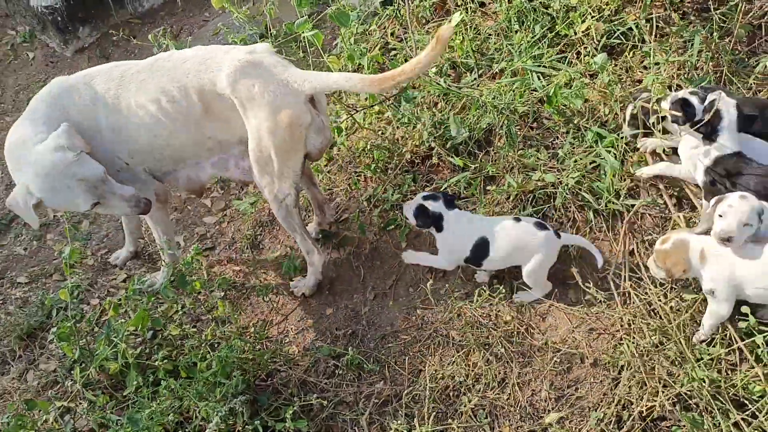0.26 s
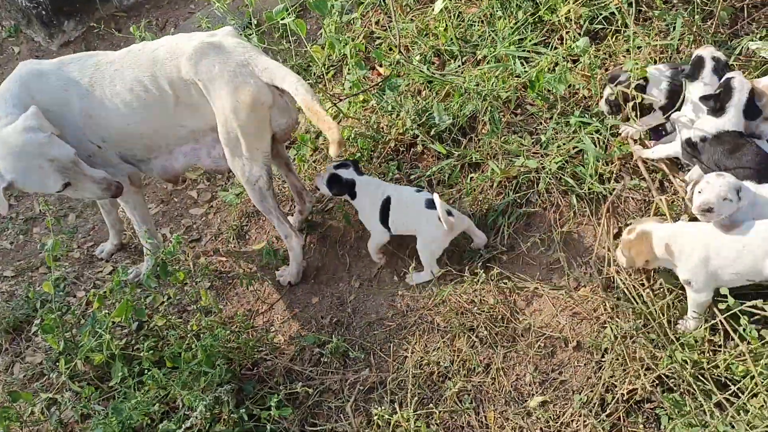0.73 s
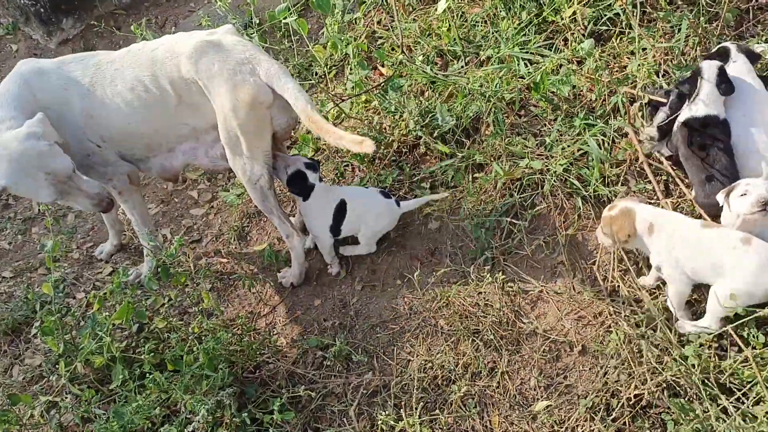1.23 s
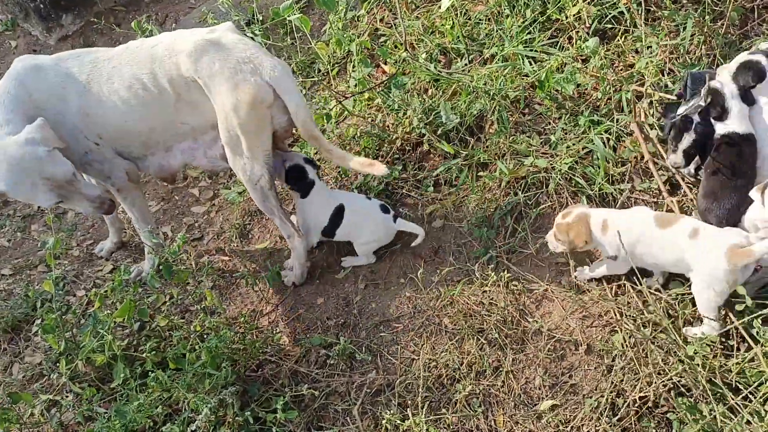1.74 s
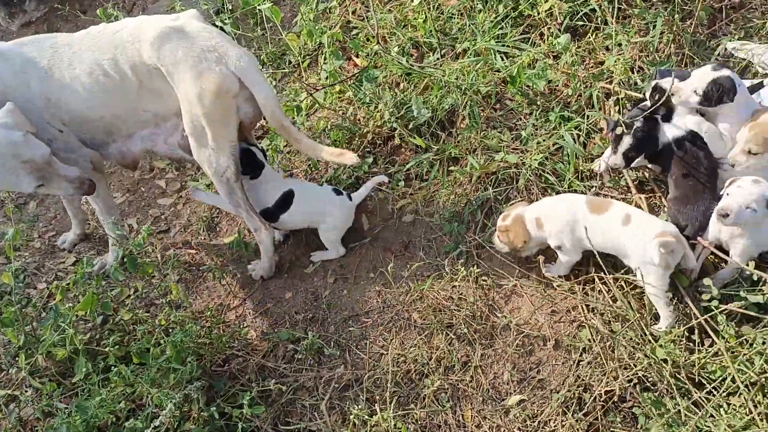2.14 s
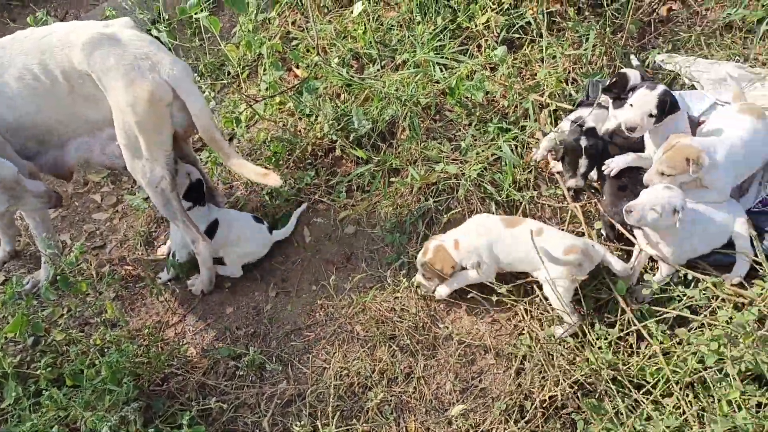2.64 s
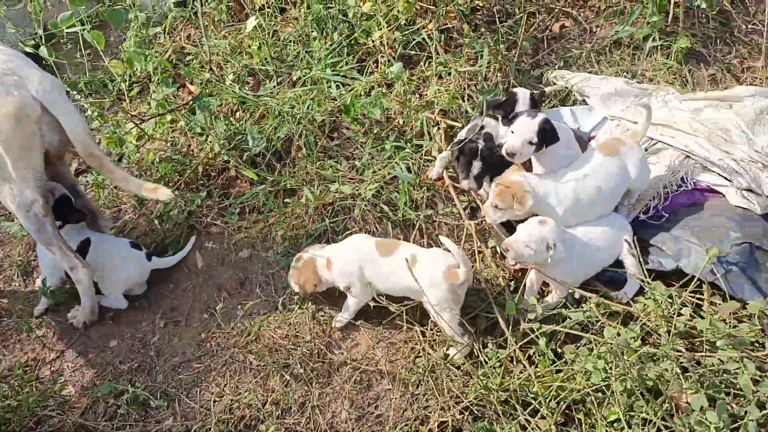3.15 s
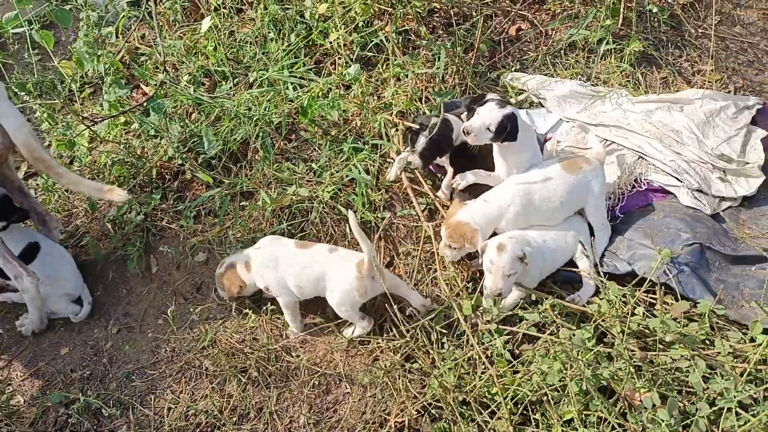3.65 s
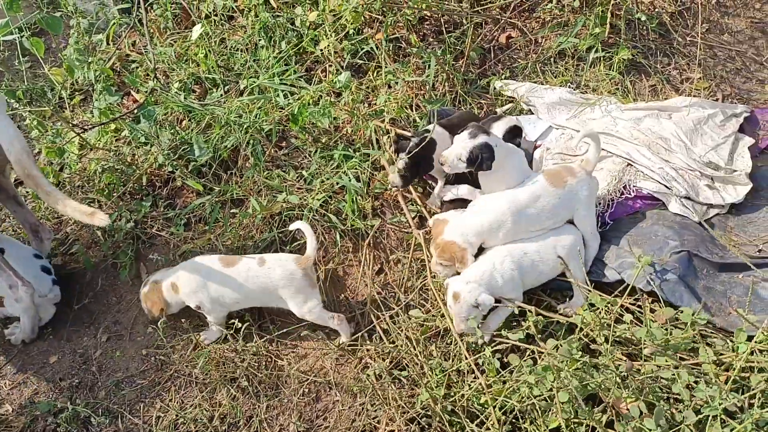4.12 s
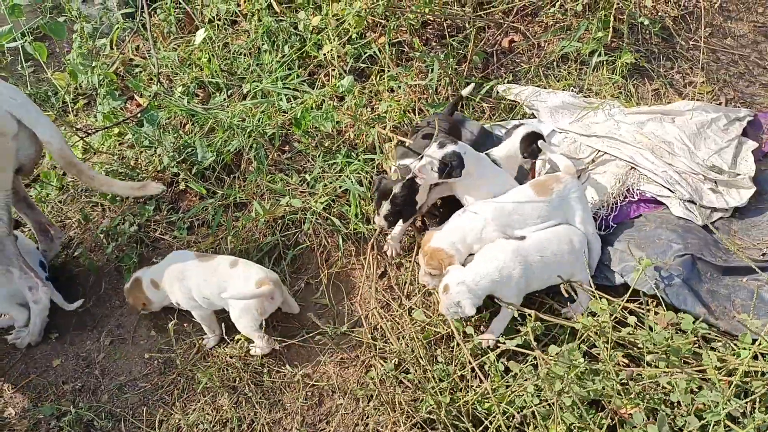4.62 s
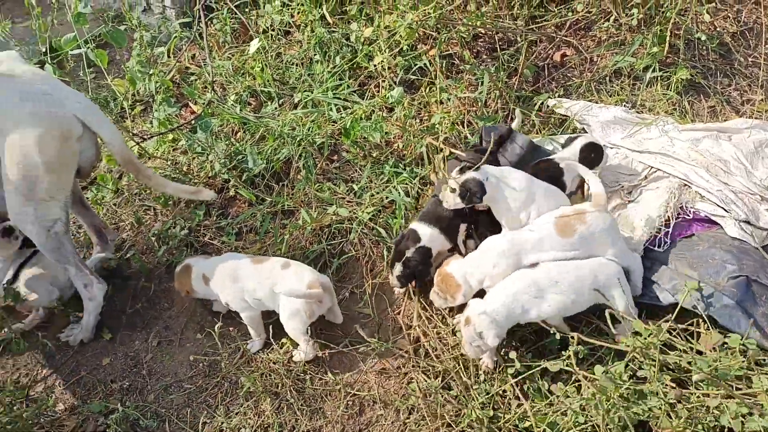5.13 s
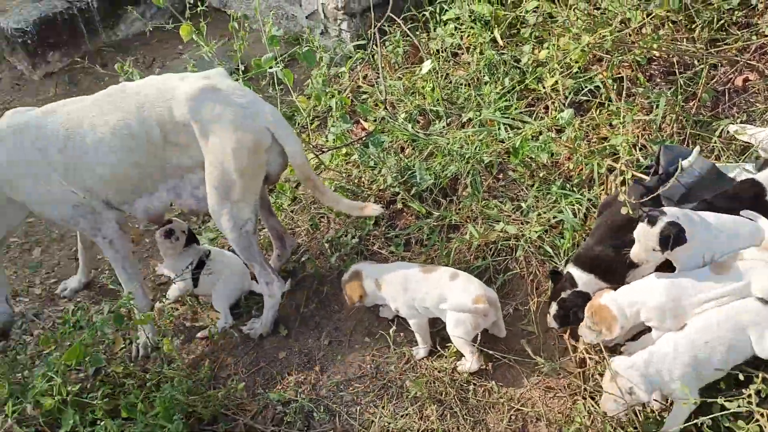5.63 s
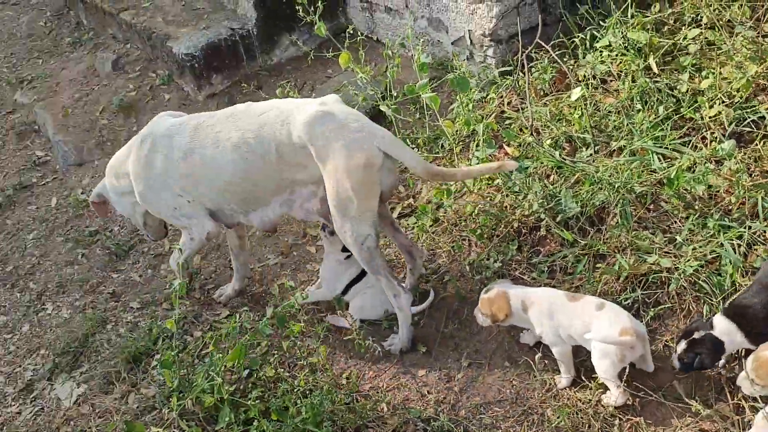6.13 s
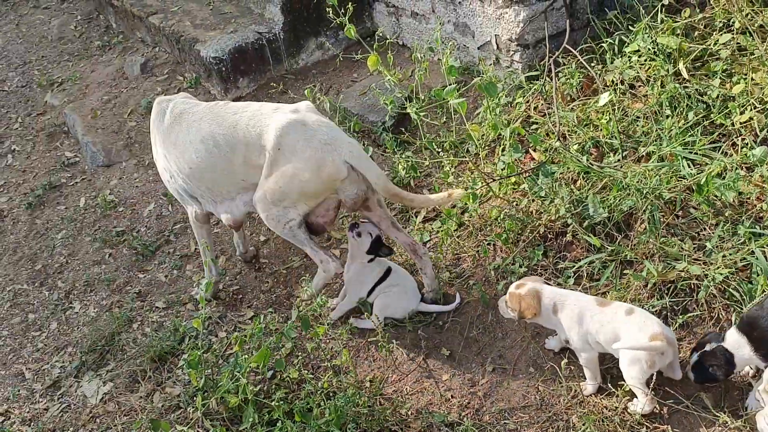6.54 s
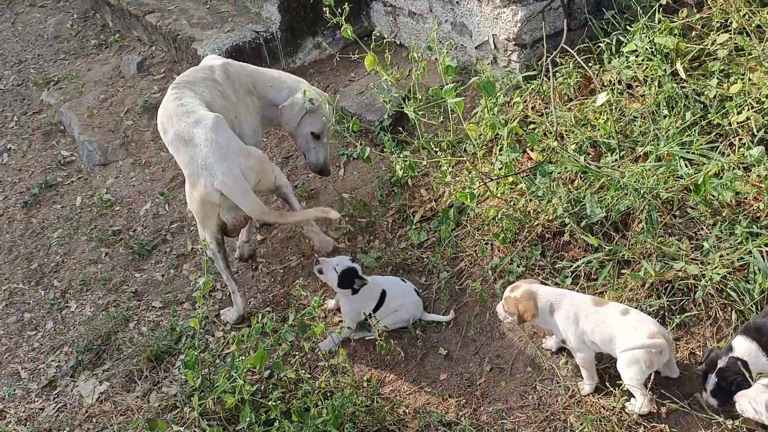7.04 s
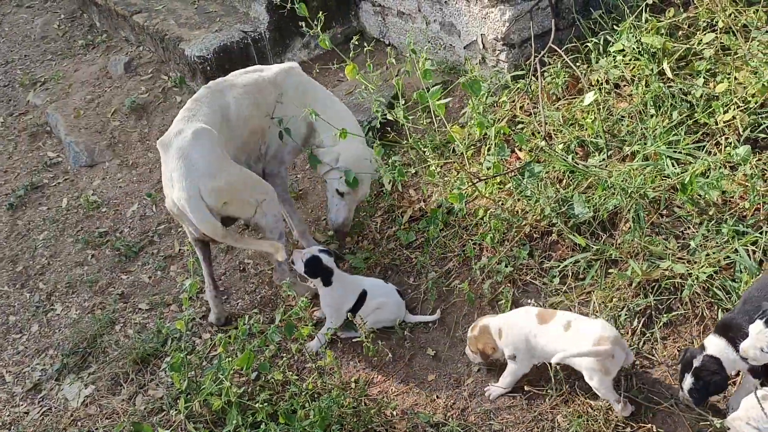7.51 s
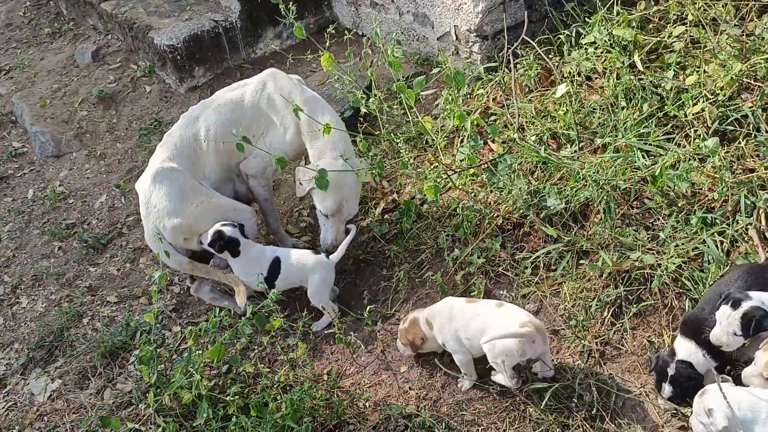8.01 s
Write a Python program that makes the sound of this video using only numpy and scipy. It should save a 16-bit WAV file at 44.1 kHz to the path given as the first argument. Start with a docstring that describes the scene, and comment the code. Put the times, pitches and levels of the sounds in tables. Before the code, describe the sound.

Young puppies whimper, grunt and squeak outdoors, breaking into a run of bright forced squeals early on, then thinning to scattered cries over faint insects.

```python
"""Puppies whimpering in the grass

Young puppies cry nearby: harmonic series on high arched pitches, from soft whimpers to bright forced squeals.
They also grunt and squeak thinly; gliding tones make the squeaks, faint squeal echoes and far calls.
Paws tick and scuff, as rung bursts and patchy noise; pulse trains at the wing-stroke rate make the insects.
Shaped noise makes the grass hiss, open air and low rumble, and noise tails scatter the calls."""
import sys
import numpy as np
from scipy import signal
from scipy.fft import rfft, irfft, next_fast_len
from scipy.io import wavfile

SR = 44100
rng = np.random.default_rng(int(sys.argv[2]) if len(sys.argv) > 2 else 0)


def put_to_file(sound):
    """Save the sound as 16-bit audio at rate SR, in the file named by the first command-line argument."""
    columns = np.atleast_2d(sound).T  # one column per channel
    safe = np.clip(columns, -1, 1)
    whole_steps = np.round(safe * 32767)
    wavfile.write(sys.argv[1], SR, whole_steps.astype(np.int16))


N = 364707
TIME = np.arange(N) / SR
TOP_HZ = 15800  # upper edge of the sound

# Relative colour of the upper harmonics from throat and muzzle: f/Hz, level/dB
THROAT_SPECTRUM = [(2000, -18.5), (3700, 8), (4400, -2.5), (5200, -0.5), (5900, -1), (6600, -12.5),
                   (8300, -7), (10000, -23), (12000, -31.5), (14000, -54)]
MUZZLE_WIDTH_HZ = 600


def larynx(hz, second_db, upper_db, pan_db, lag_ms, slope_db=0, muzzle_hz=6000, lift_db=0, overtone_pan=0.5):
    """Source-filter principle: a strong fundamental, with overtones shaped by throat and muzzle."""
    lag_s = np.array([[0], [lag_ms / 1000]])
    phase = 2 * np.pi * (np.cumsum(hz) / SR - lag_s * hz)
    side_db = np.array([[.5], [-.5]]) * pan_db
    out = np.sin(phase) * unit(undb(side_db))
    for k in range(2, 11):
        if k == 2:
            gain = undb(second_db)
        else:
            # slope: further loss for each harmonic past the fourth
            gain = undb(upper_db - slope_db * max(k - 4, 0)) * colour(THROAT_SPECTRUM, k * hz)
        gain = gain * undb(lift_db * np.exp(-((k * hz - muzzle_hz) / MUZZLE_WIDTH_HZ) ** 2))
        # the throat delays each overtone differently
        overtone = np.sin(k * phase + np.pi * k ** 2 / 2)
        out = out + gain * overtone * undb(side_db * overtone_pan)
    return np.sqrt(2) * out


# Pitch and relative level contours, one list per squeal: t/s, f/Hz, level/dB
SQUEAL_CONTOURS = [
    [(2.745, 1122, -56.5), (2.772, 1347, -54.5), (2.788, 1462, -35.5), (2.804, 1572, -33),
     (2.87, 1710, -28.5), (2.906, 1600, -41), (2.918, 1480, -36), (2.93, 1250, -47.5), (2.94, 1350, -41.5)],
    [(3.1, 1110, -63), (3.114, 1166, -41), (3.13, 1303, -33.5), (3.156, 1581, -29), (3.206, 1803, -21),
     (3.278, 1788, -17), (3.334, 1729, -23.5), (3.348, 1673, -23.5), (3.366, 1371, -44)],
    [(3.535, 940, -59), (3.577, 1274, -30.5), (3.591, 1536, -24.5), (3.641, 1742, -17.5),
     (3.675, 1738, -18), (3.697, 1712, -34), (3.737, 1633, -28.5), (3.859, 1514, -52), (3.87, 1394, -64.5)],
    [(4.08, 1355, -41), (4.104, 1455, -45), (4.134, 1463, -24.5), (4.146, 1480, -25), (4.182, 1459, -30),
     (4.198, 1314, -52.5)],
    [(6.39, 799, -43.5), (6.43, 1183, -53.5), (6.458, 1534, -37), (6.485, 1505, -39.5), (6.53, 1340, -43),
     (6.595, 1097, -62)],
]
# Position of each squeal: left minus right/dB, lag of the right port/ms
SQUEAL_POSITIONS = [(-6.5, .13), (-4, 0.038), (-3, 0.048), (-5.5, 0.034), (-3.5, 0.396)]
# Mouth in each squeal: widest at t/s, second harmonic then/dB, its fall away from that moment/(dB/s),
# upper harmonics pressed/dB, relaxed/dB, muzzle resonance f/Hz, its lift/dB
SQUEAL_MOUTHS = [(2.79, -2.5, 111, -0.5, -8, 7950, 1), (3.159, 3.5, 140, 4, -10, 7000, -6.5),
                 (3.578, 3.5, 452, -2, -12.5, 4880, 2), (4.072, -15, 221, -2, -15, 6060, 7),
                 (6.428, 12, 908.5, -8, -12.5, 7520, 11.5)]
SQUEAL_DB = 1  # gain on all squeals
PRESS_HOLD_S, RELAX_S = 0.039, 0.0016  # pressing outlasts the widest mouth, then relaxes
ONSET_DULL_DB, ONSET_S = 29.5, 0.012  # overtones start this much weaker and build up over this time
CREST_JITTER = .0018  # share of the pitch


def squeals(strain_jitter=0.011, shimmer_db=1.0):
    """Forced phonation: pressed folds enrich the overtones; pitch is roughest away from its crest."""
    out, waver, flutter = np.zeros((2, N)), wander(240), wander(64)
    rasp = undb(-31.5) * unit(band(noise(THROAT_SPECTRUM), 2700, 11000, order=4))
    for contour, mouth, (pan_db, lag_ms) in zip(SQUEAL_CONTOURS, SQUEAL_MOUTHS, SQUEAL_POSITIONS):
        widest, open_db, closing, pressed_db, relaxed_db, muzzle_hz, lift_db = mouth
        knots, knot_hz, knot_db = np.transpose(contour)
        at = span(knots[0], knots[-1])
        t = TIME[at]
        hz = np.interp(t, knots, knot_hz)
        db = np.interp(t, knots, knot_db)

        dull_db = ONSET_DULL_DB * np.exp(-(t - t[0]) / ONSET_S)
        press = (1 - np.tanh((t - widest - PRESS_HOLD_S) / RELAX_S)) / 2
        second_db = open_db - closing * np.abs(t - widest) - dull_db
        upper_db = relaxed_db + (pressed_db - relaxed_db) * press - dull_db

        strain = np.clip((hz.max() - hz) / 250, 0, 1)
        hz = hz * (1 + (CREST_JITTER + strain_jitter * strain) * waver[at])
        voice = larynx(hz, second_db, upper_db, pan_db, lag_ms, muzzle_hz=muzzle_hz, lift_db=lift_db)
        voice_db = db + shimmer_db * (0.52 + strain) * flutter[at]
        out[:, at] += voice * undb(voice_db) * fade(t, 0.0038, 0.0062)
        # turbulence in the tight throat fills in between the overtones
        out[:, at] += rasp[at] * undb(db + upper_db) * (1 + 2 * strain)
    return undb(SQUEAL_DB) * band(out, 900, TOP_HZ, order=4)


def soft_cry(t, hz, db, overtones_db, pan_db, waver, flutter,
             jitter=0.013, shimmer_db=2.5, second_db=-7, upper_db=-5):
    """Unforced phonation: the lower the cry, the slacker the folds and the less regular their motion."""
    slack = 1600 / hz.max()
    hz = hz * (1 + jitter * slack ** 2 * waver)
    cry = larynx(hz, overtones_db + second_db, overtones_db + upper_db, pan_db, lag_ms=0.15, slope_db=9.5)
    return cry * undb(db + shimmer_db * slack * flutter) * fade(t, 0.024, 0.017)


# Soft arched whimpers: start t/s, crest t/s, end t/s, start f/Hz, crest f/Hz, crest level/dB,
# relative overtones/dB, left minus right/dB
WHIMPER_ARCHES = [(0.601, 0.695, .72, 964, 1630, -49, -12.5, -4),
                  (0.869, 0.973, 1.05, 900, 1617, -51, -18.5, -4.5),
                  (1.204, 1.276, 1.345, 1244, 1627, -52, -14, -7),
                  (1.478, 1.556, 1.7, 900, 1564, -54.5, -11, -3),
                  (2.433, 2.506, 2.565, 1180, 1646, -43, -8, -12.5),
                  (3.044, 3.136, 3.16, 1090, 1630, -57, -16, -1),
                  (3.325, 3.405, 3.492, 1201, 1634, -44, -11.5, -3),
                  (3.679, 3.739, 3.86, 1086, 1507, -48, -17, -3),
                  (4.025, 4.117, 4.24, 940, 1576, -44, -12.5, 0),
                  (6.116, 6.186, 6.245, 1076, 1616, -48, -3, -12),
                  (6.761, 6.826, 6.885, 790, 1152, -57, -18, 1),
                  (7.539, 7.606, 7.645, 1390, 1610, -51.5, -4, -11),
                  (7.849, 7.912, 7.942, 1323, 1560, -50, -4, -1),
                  (8.124, 8.204, 8.275, 1207, 1610, -45, -8.5, -2)]
SAG_HZ_PER_S = 5300  # mean fall of pitch after the crest
ARCH_POWER, FALL_POWER = 1.6, 1.9  # roundness of the rise and of the fall
EFFORT_DB_PER_KHZ = 2  # a whimper is softer the further it is below its crest


def whimpers():
    """Pitch follows effort: frequency and level arch together over a crest and sag as effort ends."""
    out, waver, flutter = np.zeros((2, N)), wander(78), wander(41)
    for start, crest, end, start_hz, crest_hz, db, overtones_db, pan_db in WHIMPER_ARCHES:
        at = span(start, end)
        t = TIME[at]
        rising = t < crest
        depth_hz = np.where(rising, crest_hz - start_hz, SAG_HZ_PER_S * (end - crest))
        from_crest = np.interp(t, [start, crest, end], [1, 0, 1])
        drop_hz = depth_hz * from_crest ** np.where(rising, ARCH_POWER, FALL_POWER)
        effort_db = -EFFORT_DB_PER_KHZ * drop_hz / 1000
        out[:, at] += soft_cry(t, crest_hz - drop_hz, db + effort_db, overtones_db, pan_db,
                               waver[at], flutter[at])
    return out


# Short low grunts: start t/s, length t/s, middle f/Hz, rise f/Hz, level/dB, roughness (0 to 1)
GRUNT_CALLS = [(0.384, 0.081, 1060, 379, -44, 0.05), (0.967, 0.04, 874, 7, -51.5, 0.12),
               (1.389, 0.062, 900, 121, -54, 0.2), (1.632, 0.063, 1110, 33, -48, 0.07),
               (1.863, 0.12, 1006, 289, -54.5, 0.08), (2.163, 0.064, 1410, 34, -46.5, 0),
               (2.233, 0.083, 818, 330, -55, 0), (2.505, 0.037, 923, 66.5, -47, 0),
               (2.787, 0.032, 864, 9, -54.5, 0), (4.364, 0.069, 1156, 320, -52, 0.1),
               (4.419, 0.048, 1098, 110, -60, 0.2), (4.423, 0.079, 566, 165, -58.5, 0),
               (4.678, 0.049, 900, 12, -52.5, 0.5), (4.697, 0.07, 739, 284.5, -40.5, 0),
               (4.948, 0.056, 1046, -10, -57.5, 0), (5.174, 0.051, 865, 170, -49, .1),
               (5.214, 0.068, 796, 254, -63.5, 0.4), (5.808, 0.062, 953, 13, -57.5, 0.52),
               (5.942, 0.047, 516, -4.5, -64, .6), (6.906, 0.045, 1080, 6, -51, 0.53),
               (7.197, 0.075, 810, -1, -51, 0.02)]
GRUNT_SCOOP = 0.13  # share by which both ends lie above the middle, before the rise
GRUNT_OVERTONES_DB, GRUNT_PAN_DB = -13, -1


def grunts(rattle_hz=260, rattle=0.52, rough_overtones_db=12):
    """Amplitude modulation: rattling folds split the tone of the rough, scooped cries into strands."""
    out, waver, flutter, shake = np.zeros((2, N)), wander(160), wander(27), wander(rattle_hz)
    for start, length, hz, rise_hz, db, rough in GRUNT_CALLS:
        at = span(start, start + length)
        t = TIME[at]
        along = np.linspace(-1, 1, len(t))
        pitch = hz * (1 + GRUNT_SCOOP * along ** 2) + rise_hz * along / 2
        overtones_db = GRUNT_OVERTONES_DB + rough_overtones_db * rough
        cry = soft_cry(t, pitch, db, overtones_db, GRUNT_PAN_DB, waver[at], flutter[at])
        out[:, at] += cry * unit(1 + 2 * rattle * rough * shake[at])
    return out


# Thin whistled squeaks, and faint gliding echoes of the squeals from a wall:
# start t/s, length t/s, start f/Hz, end f/Hz, level/dB, roughness (0 to 1)
THIN_GLIDES = [(1.276, 0.072, 3510, 3178, -42.5, 0.2), (1.341, 0.029, 4760, 4200, -56, 0.42),
               (1.476, 0.088, 2675, 2400, -57.5, 0.28), (1.483, 0.067, 5250, 4970, -57.5, .2),
               (1.548, 0.038, 4780, 3600, -51.5, 0.54), (1.696, .11, 2790, 3240, -64.5, 0.88),
               (2.096, 0.035, 3177, 5550, -50.5, 1), (2.12, 0.052, 3277, 3174, -46, .05),
               (2.174, 0.047, 5020, 3930, -55, 0.2), (3.09, 0.036, 2310, 1910, -44, .6),
               (3.294, .055, 2847, 3560, -50.5, 0.36), (3.436, 0.063, 2070, 1893, -51, 0.77),
               (3.492, 0.044, 5030, 3626, -54.5, 0.2), (3.703, 0.11, 4080, 3940, -52, 0.39),
               (3.743, 0.046, 2800, 3250, -80, 0.5), (5.588, 0.1, 2594, 2320, -59, 0.65),
               (5.642, 0.053, 4590, 3800, -53.5, 0.17), (5.723, 0.05, 4440, 3770, -58, 0.42),
               (5.903, 0.19, 4960, 3900, -62.5, 0.6), (5.909, 0.21, 2600, 2120, -60.5, 0.4),
               (5.971, 0.078, 4000, 3300, -59.5, 0.73), (7.351, 0.088, 4660, 4130, -61.5, 0.42)]
GLIDE_BEND = 1.7  # the glide speeds up towards the end


def squeaks_and_squeal_echoes(jitter=0.066, shimmer_db=5.0, octave_db=-27, rasp_db=-6):
    """Frequency glide: thin tones for squeaks and wall echoes; jitter and rasp grow with roughness."""
    out, waver, flutter = np.zeros(N), wander(400), wander(150)
    rasp = undb(rasp_db) * unit(band(noise(THROAT_SPECTRUM), 1900, 8200))
    for start, length, start_hz, end_hz, db, rough in THIN_GLIDES:
        at = span(start, start + length)
        t = TIME[at]
        hz = start_hz + (end_hz - start_hz) * np.linspace(0, 1, len(t)) ** GLIDE_BEND
        phase = 2 * np.pi * np.cumsum(hz * (1 + jitter * rough * waver[at])) / SR
        tone = np.sqrt(2) * (np.sin(phase) + undb(octave_db) * np.sin(2 * phase))
        level = undb(db + shimmer_db * rough * flutter[at]) * fade(t, 0.0085, 0.0063)
        out[at] += (tone + rough ** 2 * rasp[at]) * level
    direct = place(out, pan_db=-0.5, lag_ms=0.011)
    return direct + undb(-11) * echo(direct, t60=0.9, low_hz=2200, high_hz=6000, build_s=0.014)


# Relative spectrum of sliding grit: f/Hz, level/dB
SCUFF_SPECTRUM = [(300, -43), (480, -16), (620, 9), (1100, 6.5), (1600, 8), (2800, 8), (4200, 3),
                  (7000, -10.5), (9500, -6), (15000, -16)]


def scrape(patchy_db=4.5):
    """Changing contact: each band of the sliding noise swells and fades on its own."""
    shared = noise(SCUFF_SPECTRUM)
    grit = shared + 4.34 * np.array([noise(SCUFF_SPECTRUM), noise(SCUFF_SPECTRUM)])
    edges = np.geomspace(400, TOP_HZ, 14)
    out = np.zeros((2, N))
    for low, high in zip(edges, edges[1:]):
        out += band(grit, low, high, order=1) * undb(patchy_db * wander(15))
    return out


# Stalks and grit ticking under paws: t/s, peak level before panning/dB, ring f/Hz
PAW_TICKS = [(0.901, -53, 12500), (1.42, -51.5, 10700), (5.446, -46.5, 6000), (5.691, -41, 4010),
             (6.222, -55.5, 3660), (6.682, -47.5, 580), (7.799, -48.5, 11040)]
# Paws scuffing over dry ground: start t/s, length t/s, relative level/dB
PAW_SCUFFS = [(0.148, 0.054, -84), (5.387, 0.12, -82.5), (6.625, 0.27, -69), (6.797, 0.43, -70),
              (7.048, 0.35, -77)]
SCUFF_ATTACK, SCUFF_RELEASE = 0.32, 0.46  # shares of each scuff's length


def paws(tick_decay_s=0.014, grain_db=-1.0, lurch_db=1):
    """Impact and friction: decaying bursts ring broad resonances; grainy pushes drive the scrape."""
    ticks, push, grit = np.zeros(N), np.zeros(N), rng.standard_normal(N)
    for start, db, hz in PAW_TICKS:
        at = span(start, start + 0.035)
        burst = grit[at] * np.exp(-(TIME[at] - start) / tick_decay_s)
        crack = ring(ring(burst, hz, hz / 2), hz, hz / 2)
        ticks[at] += undb(db) * crack / np.abs(crack).max()
    for start, length, db in PAW_SCUFFS:
        at = span(start, start + length)
        push[at] += undb(db) * fade(TIME[at], SCUFF_ATTACK * length, SCUFF_RELEASE * length)
    unevenness = undb(2.0 + grain_db * wander(180) + lurch_db * wander(13.0))
    return place(ticks, pan_db=13.5, lag_ms=0) + push * unevenness * scrape()


# A far bird's pure whistles: t/s, f/Hz, relative level/dB
BIRD_WHISTLES = [(4.49, 2760, -66.5), (4.689, 2257, -70), (5.126, 2718, -65.5), (5.32, 2288, -67.5),
                 (5.756, 2692, -65.5), (6.255, 2697, -67), (7.391, 2890, -62), (7.686, 2806, -58),
                 (7.82, 2264, -71), (7.973, 2826, -62)]
WHISTLE_S, WHISTLE_WIDTH_HZ = 0.11, 56
# Another bird's repeated hoarse note: t/s, relative level/dB
BIRD_CROAKS = [(2.469, -66), (4.099, -65), (4.898, -65.5), (5.717, -66)]
CROAK_S, CROAK_HZ, CROAK_GLIDE_HZ, CROAK_WIDTH_HZ = 0.26, 1985, -59, 170
# Faint hoarse falling sounds, from far callers or echoed off a wall:
# start t/s, length t/s, f/Hz, relative level/dB
FAINT_FALLS = [(0.406, 0.13, 4020, -71), (1.766, 0.14, 4024, -68.5), (1.783, 0.11, 5040, -68),
               (5.315, .17, 3337, -69), (6.923, 0.15, 2820, -67), (7.074, 0.16, 3145, -63.5),
               (7.308, 0.091, 3207, -61), (7.525, 0.09, 3370, -61.5)]
FALL_SHARE, FALL_WIDTH_SHARE = 0.083, 0.054  # shares of the pitch


def far_calls():
    """Frequency modulation: random pitch scatter widens a pure tone into a hoarse note, heard with echo."""
    out, scatter, flutter_db = np.zeros(N), wander(140), 2.8 * wander(50)
    calls = [(s, WHISTLE_S, hz, 0, WHISTLE_WIDTH_HZ, db) for s, hz, db in BIRD_WHISTLES]
    calls += [(s, CROAK_S, CROAK_HZ, CROAK_GLIDE_HZ, CROAK_WIDTH_HZ, db) for s, db in BIRD_CROAKS]
    calls += [(s, length, hz, -FALL_SHARE * hz, FALL_WIDTH_SHARE * hz, db)
              for s, length, hz, db in FAINT_FALLS]
    for start, length, hz, glide_hz, width_hz, db in calls:
        at = span(start, start + length)
        t = TIME[at]
        pitch = hz + glide_hz * (t - start) / length + width_hz / 2 * scatter[at]
        tone = np.sqrt(2) * np.sin(2 * np.pi * np.cumsum(pitch) / SR)
        out[at] += tone * undb(db + flutter_db[at]) * fade(t, 0.0086, 0.07)
    direct = place(out, pan_db=18.0, lag_ms=0)
    return direct + undb(5.0) * echo(direct, t60=0.88, low_hz=900, high_hz=7000, build_s=0.0062)


def cricket(stroke_hz=71.7, hz=5865, sharpness=1.1, unsteady=.04, scatter_hz=42, sag_hz=15, uneven_db=1.3):
    """Stridulation: each stroke draws file over scraper, a short nearly pure note that sags in pitch."""
    stroke = 2 * np.pi * np.cumsum(stroke_hz * (1 + unsteady * wander(13.5))) / SR
    pitch = hz - sag_hz * np.sin(stroke) + scatter_hz * wander(110)
    tone = np.sin(2 * np.pi * np.cumsum(pitch) / SR)
    return unit(np.exp(sharpness * np.cos(stroke)) * tone * undb(uneven_db * wander(120)))


def insect(stroke_hz, hz, width_hz, sharpness, unsteady):
    """Resonant excitation: each wing stroke is a short rasp that rings the wing's resonance."""
    phase = 2 * np.pi * np.cumsum(stroke_hz * (1 + unsteady * wander(5.1))) / SR
    song = np.exp(sharpness * (np.cos(phase) - 1)) * rng.standard_normal(N)
    for _ in range(3):
        song = ring(song, hz, width_hz)
    return unit(song) * undb(0.63 * wander(4.0))


# Relative spectrum of the outdoor air: f/Hz, level/dB
AIR_SPECTRUM = [(20, -51.5), (45, -9), (75, -2.5), (130, -4.5), (260, -11), (460, -17), (680, -14),
                (1100, -21), (1500, -11.5), (1850, -16.5), (2400, -12), (4500, -27.5), (7000, -47.5),
                (15000, -45.5)]
# Relative spectrum of the high grass hiss: f/Hz, level/dB
HISS_SPECTRUM = [(6500, -39.5), (7300, -2.5), (8400, 13.5), (9300, 11.5), (10500, 2.5), (13000, -2.5),
                 (15500, -23)]
# Puffs of air on the microphone: t/s, relative level/dB
AIR_PUFFS = [(2.87, -65.5), (3.119, -69.5), (3.5, -62), (6.97, -65)]
PUFF_WIDTH_S, CALM_DB = 0.092, -87.5  # half length of a puff; relative rumble level between puffs


def meadow():
    """Superposed ambience: a cricket on the right, a central buzz, hiss on the left, air and rumble."""
    chirr = undb(-64.5) * cricket()
    buzz = undb(-76) * insect(stroke_hz=116, hz=8450, width_hz=1300, sharpness=1.5, unsteady=.01)
    swell_db = 1.1 * wander(4)
    grass = undb(-67 + swell_db + 2.1 * wander(200)) * noise(HISS_SPECTRUM)
    # air partly shared by both ports, partly separate
    air = noise(AIR_SPECTRUM) + .7 * np.array([noise(AIR_SPECTRUM), noise(AIR_SPECTRUM)])
    air = air * undb(-76 + 1.5 * wander(11))
    low = [(20, -27.0), (45, 4.5), (70, 16.0), (110, 1.5), (200, -25.5), (900, -74.5)]  # f/Hz, level/dB
    puffs = sum(undb(db) * np.exp(-((TIME - s) / PUFF_WIDTH_S) ** 2) for s, db in AIR_PUFFS)
    rumble = noise(low) * (undb(CALM_DB) + puffs) * undb(4.7 * wander(21.0))
    insects = place(chirr, pan_db=-13, lag_ms=0.049) + buzz
    return insects + place(grass, pan_db=8.0, lag_ms=0) + air + rumble


def echo(x, t60, low_hz, high_hz, build_s):
    """Diffuse reflection: a decaying noise tail, different at each port, scatters the mean signal."""
    t = TIME[:SR]
    tail = rng.standard_normal((2, SR)) * undb(-60 * t / t60) * (1 - np.exp(-(t / build_s) ** 2))
    tail = band(tail / np.sqrt(np.sum(tail[0] ** 2)), low_hz, high_hz)
    return signal.fftconvolve(x.mean(0)[None], tail, axes=1)[:, :N]


def place(x, pan_db, lag_ms):
    """Interaural principle at two ports: a level difference, and a delay at the right one."""
    delayed = np.interp(TIME - lag_ms / 1000, TIME, x)
    return np.array([x * undb(pan_db / 2), delayed * undb(-pan_db / 2)])


def undb(db):
    """Logarithmic level: decibels to amplitude gain."""
    return 10 ** (np.asarray(db) / 20)


def unit(x):
    """Effective value: scale to rms 1."""
    return x / np.sqrt(np.mean(x ** 2))


def colour(points, hz):
    """Frequency response: gain interpolated over log frequency between (f/Hz, level/dB) points."""
    f, db = np.transpose(points)
    return undb(np.interp(np.log(hz + 1), np.log(f), db))


def noise(points):
    """Spectral shaping: white noise weighted by a frequency response, at rms 1."""
    size = next_fast_len(N)
    spectrum = rfft(rng.standard_normal(size)) * colour(points, np.fft.rfftfreq(size, 1 / SR))
    return unit(irfft(spectrum, size)[:N])


def wander(rate_hz):
    """Low-pass random motion: noise of rms 1 with a Gaussian roll-off at the given rate."""
    size = next_fast_len(N)
    f = np.fft.rfftfreq(size, 1 / SR)
    spectrum = rfft(rng.standard_normal(size)) * np.exp(-.5 * (f / rate_hz) ** 2)
    return unit(irfft(spectrum, size)[:N])


def ring(x, hz, width_hz):
    """Simple resonance: one peak with gain 1 at its centre."""
    hz = min(hz, .45 * SR)
    return signal.lfilter(*signal.iirpeak(hz, hz / width_hz, fs=SR), x)


def band(x, low_hz, high_hz, order=2):
    """Band-pass filtering: keep what lies between two frequencies."""
    edges = [low_hz, min(high_hz, SR / 2 - 1)]
    return signal.sosfilt(signal.butter(order, edges, "band", fs=SR, output="sos"), x)


def span(start, end):
    """Sampling: the samples between two times in seconds."""
    return slice(int(start * SR), min(int(end * SR), N))


def fade(t, attack, release):
    """Amplitude envelope: squared-sine opening and closing, in seconds."""
    nearest = np.minimum((t - t[0]) / attack, (t[-1] - t) / release)
    return np.sin(np.pi / 2 * np.clip(nearest, 0, 1)) ** 2


def scene():
    """Direct and reflected sound: puppies with ground scatter, a far wall's slap and a faint tail."""
    puppies = squeals() + whimpers() + grunts() + squeaks_and_squeal_echoes()
    ground = undb(-20) * echo(puppies, t60=.12, low_hz=1100, high_hz=9000, build_s=.005)
    wall_s = .178
    slap = echo(puppies, t60=0.046, low_hz=2600, high_hz=5100, build_s=0.00312)
    wall = undb(-25.5) * np.pad(slap, ((0, 0), (int(wall_s * SR), 0)))[:, :N]
    far = undb(-22.0) * echo(puppies, t60=0.8, low_hz=1700, high_hz=6000, build_s=0.024)
    return puppies + ground + wall + far + paws() + far_calls() + meadow()


def record(dry):
    """Receiver response: the right port is dull in the high treble; both ports lose the top."""
    dull = [(7000, 0.0), (9500, -26.0), (15000, -4)]  # f/Hz, level/dB
    right = irfft(rfft(dry[1]) * colour(dull, np.fft.rfftfreq(N, 1 / SR)), N)
    top_cut = signal.ellip(10, .1, 80, TOP_HZ, fs=SR, output="sos")
    return signal.sosfilt(top_cut, [dry[0], right])


dry = scene()
out = record(dry)
put_to_file(out)
```